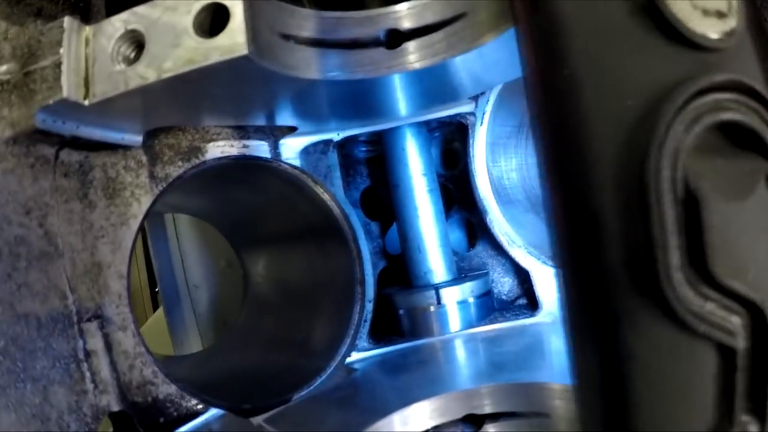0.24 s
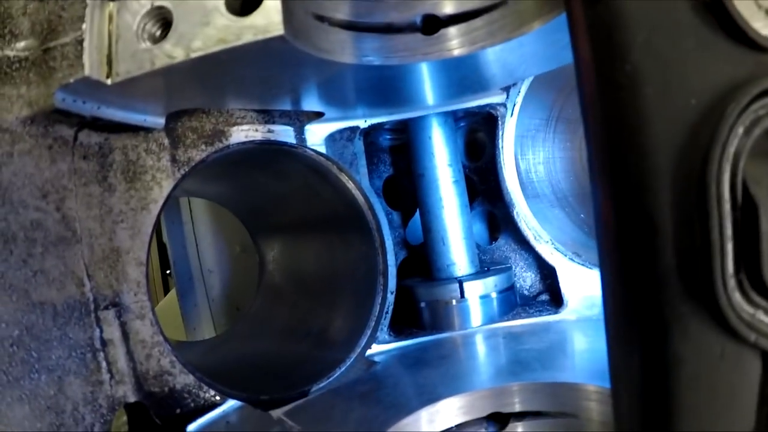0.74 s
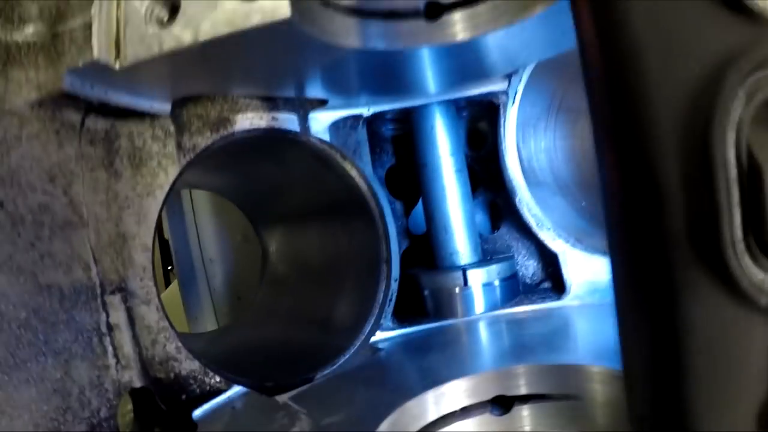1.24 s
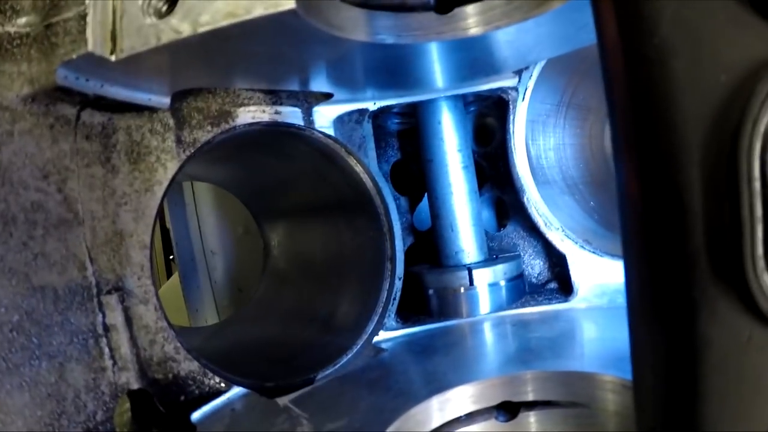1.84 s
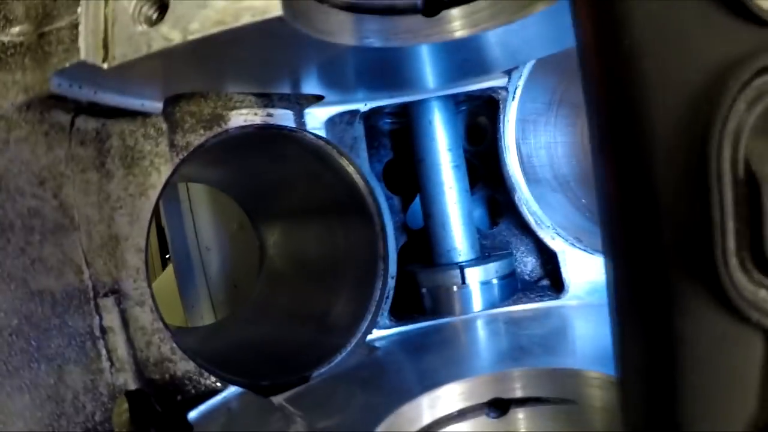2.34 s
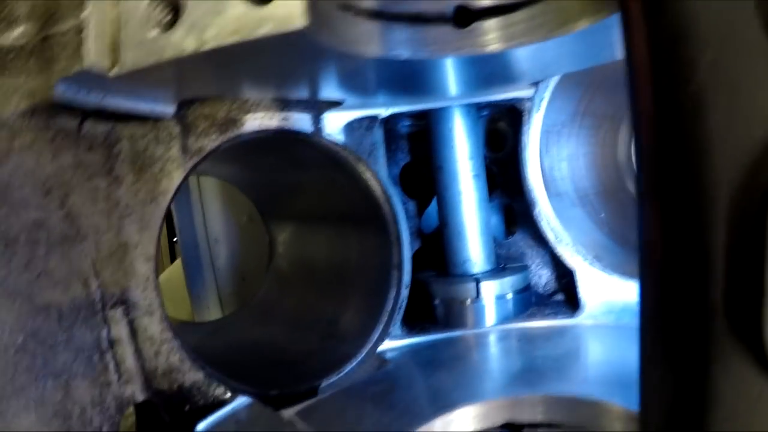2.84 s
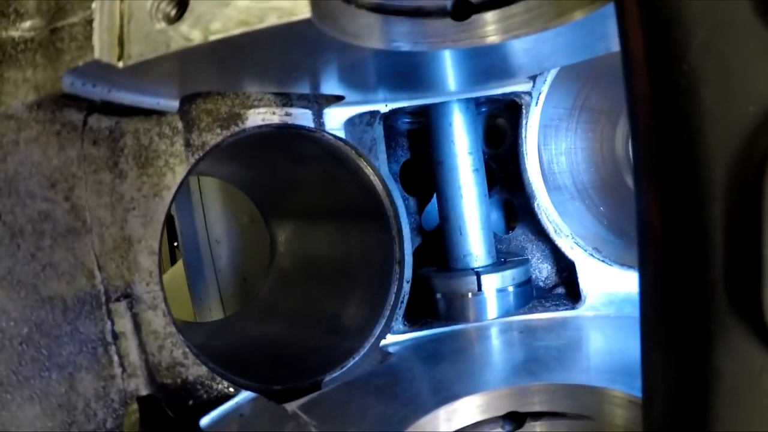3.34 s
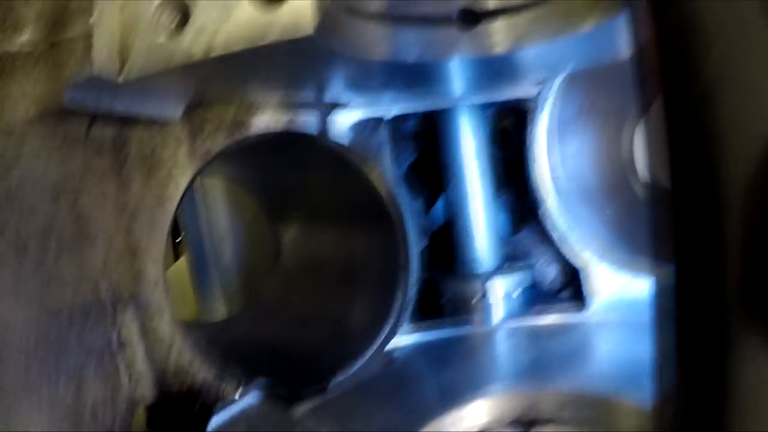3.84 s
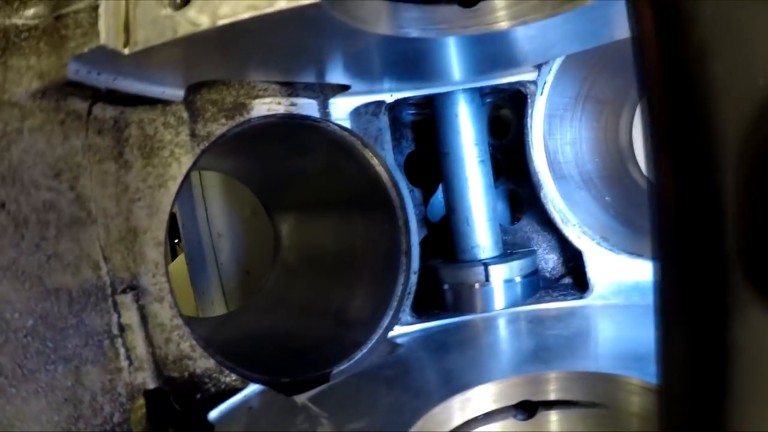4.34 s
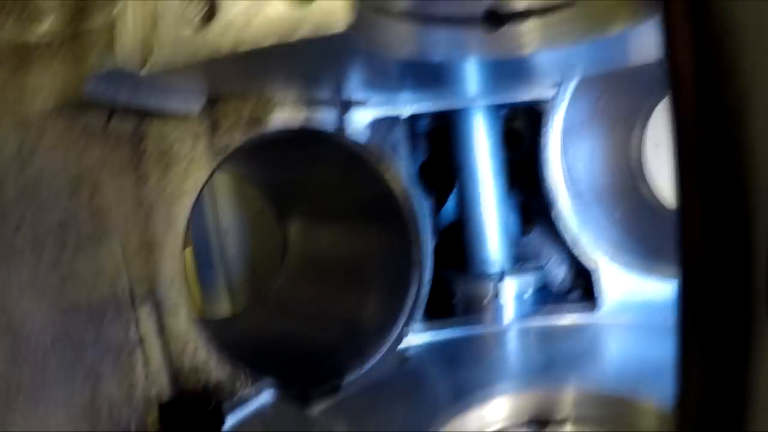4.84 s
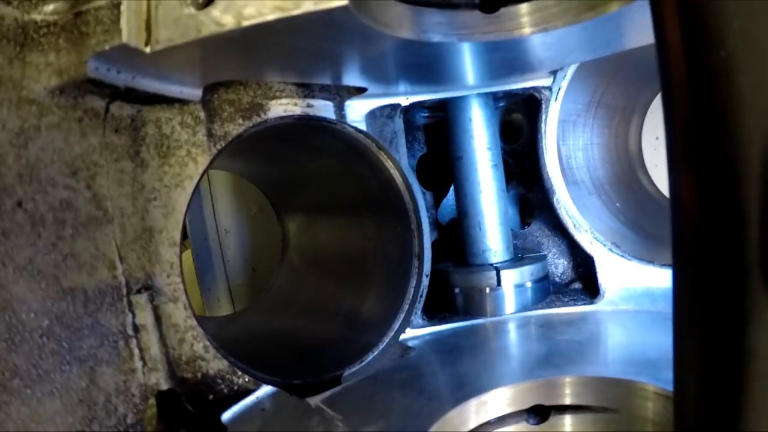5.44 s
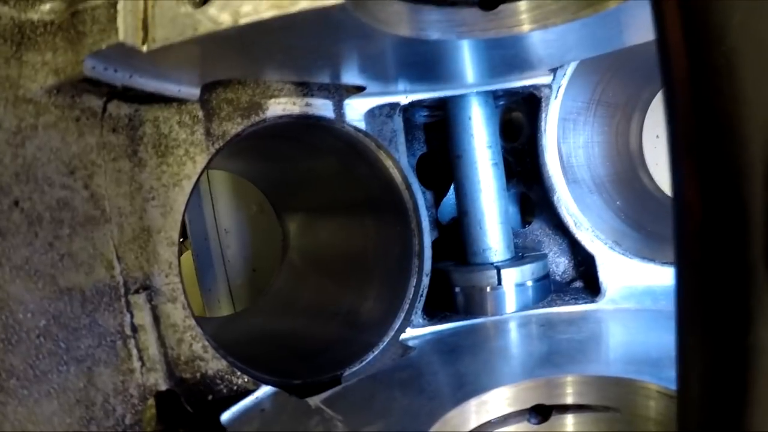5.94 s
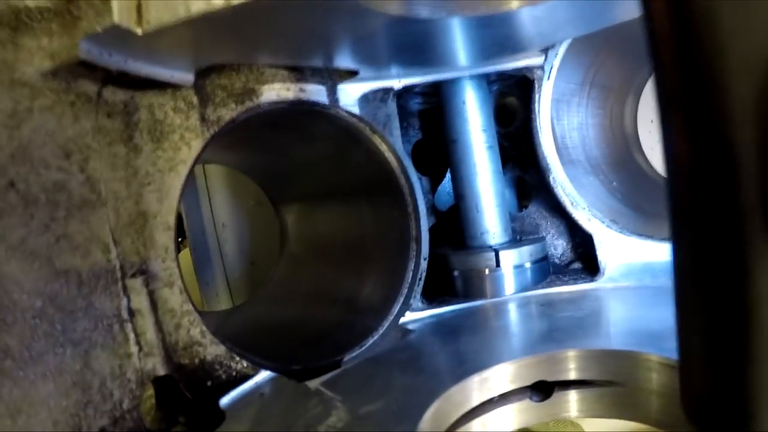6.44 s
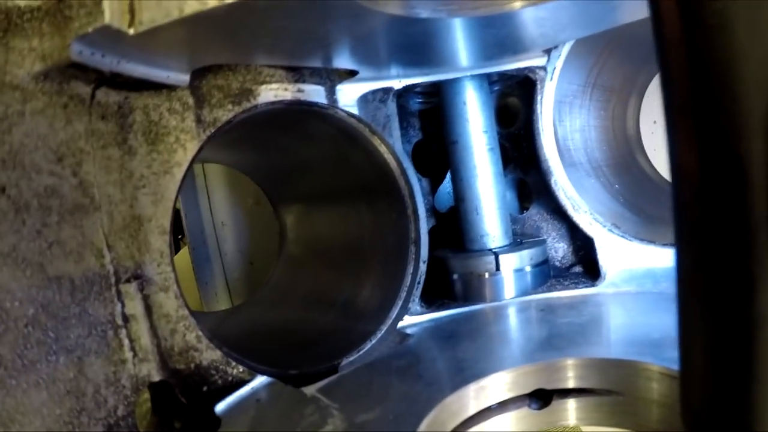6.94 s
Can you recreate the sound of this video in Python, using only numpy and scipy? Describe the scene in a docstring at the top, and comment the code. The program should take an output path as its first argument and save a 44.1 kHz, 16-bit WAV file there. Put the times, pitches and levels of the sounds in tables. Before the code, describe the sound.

Close, harsh metal hammering in a garage, heavy clanging blows about a second apart, each followed by a light tap, rattles and short echo.

```python
"""Driving a bearing home, close by in a garage

A hand-held stereo microphone hears a hammer drive a bearing into an engine block through a steel driver.
Five heavy blows, after the dying end of another, alternate with light taps as the hammer is set back.
Steel contacts are filtered noise and dying sines; the block then shudders on its stand and a loose part rattles.
Walls add noise-like echoes; rustle, rumble, hiss and a drone lie behind. Blows overload the recorder and duck it."""
import sys
import numpy as np
from scipy import signal
from scipy.fft import rfft, irfft
from scipy.io import wavfile
from scipy.ndimage import minimum_filter1d

SR = 44100
rng = np.random.default_rng(int(sys.argv[2]) if len(sys.argv) > 2 else 0)


def transcribe(u):
    """Save the signal u as a 16-bit wav file named by the first command-line argument.

    u: samples, shape (n,) or (channels, n), limited to [-1, 1]; the rate is SR.
    q: integer samples, one column per channel.
    """
    v = np.clip(np.atleast_2d(u).T, -1, 1)
    q = np.round(v * 32767).astype(np.int16)
    wavfile.write(sys.argv[1], SR, q)


N = 316638  # samples


def amp(db):
    """Decibels to gain."""
    return 10 ** (np.asarray(db) / 20)


def evened(x):
    """Scales to rms 1."""
    return x / np.sqrt(np.mean(x ** 2) + 1e-20)


def read(points, hz):
    """Reads a table on a log-frequency axis."""
    f, value = np.transpose(points)
    return np.interp(np.log(hz + 1), np.log(f + 1), value)


def add(mix, start_s, sound):
    """Mixes a sound in at a time in seconds; what falls outside is dropped."""
    at = round(start_s * SR)
    sound = sound[:, max(-at, 0):]
    part = mix[:, max(at, 0):][:, :sound.shape[1]]
    part += sound[:, :part.shape[1]]


def stereo_white(size, same):
    """White noise for left and right; same is the share of power common to both."""
    same = np.clip(same, 0, 1)
    common = np.sqrt(same) * rng.standard_normal(size)
    return common + np.sqrt(1 - same) * rng.standard_normal((2, size))


def noise(colour, size, same):
    """Steady stereo noise of a given colour and left-right likeness, rms 1."""
    hz = np.fft.rfftfreq(size, 1 / SR)
    spectrum = rfft(stereo_white(size, same)) * amp(read(colour, hz))
    return evened(irfft(spectrum, size))


def octaves(hz):
    """Octaves above 3 kHz, the middle of the steel's range, for tilting a spectrum between 1 and 12 kHz."""
    return np.log2(np.clip(hz, 1000, 12000) / 3000)


def dying(t60, size):
    """An envelope that falls 60 dB in t60 seconds."""
    return np.exp(-np.log(1000) * np.arange(size) / SR / t60)


def ring(modes, size, scatter_db, spread):
    """Dying sines, excited a little differently at each contact and out of step between left and right."""
    t = np.arange(size) / SR
    out = np.zeros((2, size))
    for hz, db, t60 in modes:
        luck, lag, start = rng.standard_normal(3)
        phase = np.pi * start + spread * lag * np.array([[-.5], [.5]])
        sine = np.sin(2 * np.pi * hz * t + phase)
        out += amp(db + scatter_db * luck) * dying(t60, size) * sine
    return out * (1 - dying(.002, size))  # soft onset


def burst(colour, envelope, same, tilt_db=0):
    """A puff of stereo noise rings through a causal filter of the given colour; the envelope sets its rms."""
    size = len(envelope)
    hz = abs(np.fft.fftfreq(size, 1 / SR))
    gain = evened(amp(read(colour, hz) + tilt_db * octaves(hz)))
    # minimum phase: the filter rings only after the puff
    response = np.exp(np.conj(signal.hilbert(np.log(gain + 1e-5))))
    puff = envelope * stereo_white(size, same)
    coloured = np.fft.ifft(np.fft.fft(puff) * response).real
    return evened(coloured) * np.sqrt(np.mean(envelope ** 2))


# How fast the garage's echo dies. Each row: frequency in Hz, t60 in seconds.
ECHO_T60 = [(100, 0.47), (1000, 0.32), (3000, 0.5), (7500, 0.43), (10000, 0.21), (15000, 0.08)]


def tail(colour, tilt_db=0, size=32768):
    """A dense echo that builds within milliseconds, each band dying at its own speed; left energy is 1."""
    hz, t, z = signal.stft(rng.standard_normal((2, size)), SR, nperseg=256)
    z = z * np.exp(-np.log(1000) * t / read(ECHO_T60, hz)[:, None])
    z = z * amp(read(colour, hz) + tilt_db * octaves(hz))[:, None]
    echo = signal.istft(z, SR, nperseg=256)[1][:, :size] * (1 - dying(0.036, size))
    echo = echo + .35 * echo[::-1]  # each side is also heard on the other
    return echo / np.linalg.norm(echo[0])


# Movement of the hands, rising before each swing and stilled after it.
# Each row: time in seconds, movement in dB on a scale where REST_DB is rest.
MOVING = [(0, -57), (.4, -63.5), (.88, -55), (1.08, -56), (1.65, -62.5), (2.15, -56), (2.55, -63),
          (3.15, -56.5), (3.3, -52.5), (3.76, -49), (3.92, -60.5), (4.55, -64), (4.88, -55.5), (5.18, -68),
          (5.5, -61.5), (6.15, -55), (6.7, -63), (7.18, -56)]
REST_DB = -60
# Colours of the hands' rustle, of the rumble and of the hiss. Each row: frequency in Hz, relative level in dB.
RUSTLE = [(53, -38), (90, -13.5), (130, 2), (201, -11.5), (272, -3), (438, -16), (488, -11), (620, -19),
          (706, -13), (896, -24), (1350, -18), (1610, -25.5), (6300, -43), (10400, -46.5), (16000, -79)]
RUMBLE = [(10, -8), (25, 5), (60, 4), (90, -14), (140, -17), (300, -47.5), (1000, -97.5)]
HISS = [(200, -22), (2000, 3.5), (4000, -6), (6400, 3), (8000, -7), (10000, -19), (13000, -21),
        (16000, -41.5)]
# Wavering drone of the garage. Each row: frequency in Hz, level in dB.
DRONE = [(60, -67), (122, -61), (258, -61.5), (318, -63), (412, -64.5), (535, -66.5), (695, -71)]
# what follows the hands: (level at rest in dB, dB gained per dB of movement)
RUSTLE_LAW, RUMBLE_LAW, HISS_LAW = (-50, 0.87), (-42.5, .9), (-71, 1.3)
# a blow jolts the hand at the microphone: rumble in dB relative to its force, time constant in seconds
JOLT_DB, JOLT_S = -34.5, .08


def background():
    """Noises follow the moving hands, each blow jolts the rumble, and a faint drone of sines wavers in phase."""
    t = np.arange(N) / SR
    moving_db = np.interp(t, *np.transpose(MOVING)) - REST_DB
    rustle, rumble, hiss = (amp(db + share * moving_db) for db, share in (RUSTLE_LAW, RUMBLE_LAW, HISS_LAW))
    jolt = sum(amp(JOLT_DB + db) * (t > s) * np.exp(-abs(t - s) / JOLT_S) for s, db, _ in BLOWS)
    out = rustle * noise(RUSTLE, N, same=.55)
    out += (rumble + jolt) * noise(RUMBLE, N, same=0.024) * amp([[-.8], [.8]])  # leans right
    out += hiss * noise(HISS, N, same=0.33)
    knots = np.linspace(0, t[-1], num=60)
    for hz, db in DRONE:
        waver = np.interp(t, knots, rng.standard_normal(len(knots)))
        out += amp(db) * np.sin(2 * np.pi * hz * t + 0.53 * waver)
    return out


# Echo strength of the garage. Each row: frequency in Hz, relative level in dB.
ECHO = [(100, 3.5), (700, -4.5), (1700, -7), (3600, -12), (5200, -3), (7800, -2), (8700, -8.5),
        (14000, -15)]


def garage(x):
    """The walls prolong whatever rings: convolution with a dense echo."""
    return signal.fftconvolve(x, tail(ECHO), axes=1)[:, :N]


BOUNCE_S, BOUNCE_JITTER_S = .019, 0.0016  # time between bounces of the loose part, and its random spread
CHATTER_FADE_DB_PER_S, CHATTER_SCATTER_DB = 53, 3.5
REBOUND_TILT_DB = -4  # dB per octave: all chatter has this tilt, and a tick gains it at each rebound


def chatter(start, first_db, count=12):
    """A knock sets the loose part bouncing in a nearly even, fading run: rows of (s, dB, dB per octave)."""
    late, luck = rng.standard_normal((count, 2)).T
    age = np.arange(count) * BOUNCE_S
    times = start + age + BOUNCE_JITTER_S * late
    levels = first_db - CHATTER_FADE_DB_PER_S * age + CHATTER_SCATTER_DB * luck
    return [(s, db, REBOUND_TILT_DB) for s, db in zip(times, levels)]


# Single ticks of the loose part. Each row: start in seconds, level in dB, brightness in dB per octave.
TICKS = [(0.1397, -46, -4), (0.1599, -34.5, -5), (1.2881, -31.5, -4), (1.4390, -29.5, -1.5),
         (1.5825, -38, -17), (2.4216, -33, -13), (2.4675, -36, -4.5), (2.5355, -35, -15),
         (2.5949, -35.5, -11.5), (4.15, -34.5, 0), (4.284, -37, -8), (4.436, -39, -7.5), (5.1315, -42, -6),
         (5.2873, -45.5, -7.5), (6.3620, -31, 6.5), (6.8325, -40, -11), (6.9716, -38, -9),
         (7.1024, -40.5, -8.5)]
# Colour of a tick. Each row: frequency in Hz, relative level in dB.
TICK = [(100, -17), (600, -14), (1100, -3), (1700, 0), (2500, -4), (4000, -13), (7500, -24), (9000, -42),
        (16000, -66)]
# A tick and its two rebounds. Each entry: level in dB relative to the tick.
TICK_BOUNCE_DB = [0, -9.5, -16]


def ticks(size=4096):
    """A loose part clicks and rebounds, or chatters after a knock: short puffs of coloured noise."""
    out, clicks = np.zeros((2, N)), []
    for s, db, tilt_db in TICKS:
        for k, step_db in enumerate(TICK_BOUNCE_DB):
            clicks.append((s + k * BOUNCE_S, db + step_db, tilt_db + k * REBOUND_TILT_DB))
    for s, _, chatter_db in KNOCKS:
        clicks += chatter(s, chatter_db)
    shape = dying(.008, size) + amp(-15) * dying(.05, size)
    for s, db, tilt_db in clicks:
        add(out, s, amp(db) * burst(TICK, shape, same=0.93, tilt_db=tilt_db))
    return out


# The block rocks on its stand.
# Each row: start in seconds, relative knock level in dB, level in dB of the chatter that it sets off.
KNOCKS = [(0.010, -34, -37.5), (0.073, -33.5, -50), (1.195, -22, -36.5), (2.125, -14.5, -34.5),
          (2.223, -18.5, -37), (2.332, -33, -44.5), (3.892, -20.5, -42), (4.031, -26.5, -40.5),
          (4.837, -18.5, -41.5), (4.912, -18.5, -38.5), (6.118, -20, -34), (6.258, -25, -32.5),
          (6.401, -32.5, -58), (6.531, -34, -50)]
# Modes of the stand. Each row: frequency in Hz, relative level in dB, t60 in seconds.
STAND = [(118, -5.5, .13), (150, -6, .08), (243, -6, .07), (277, 0, .11), (355, -7, .06), (445, -17, .08),
         (585, -19, .09)]
# Grit in each knock. Each row: frequency in Hz, relative level in dB.
SCUFF = [(50, -15.5), (130, -10.5), (200, -1), (290, 5.5), (420, -11.5), (800, -19.5), (1300, -24.5),
         (3000, -36), (9000, -69)]
ROCK_BACK_S, ROCK_BACK_DB = .034, -12  # each knock is followed by a softer one as the block rocks back


def knocks(size=16384):
    """The heavy block rocks on its stand and back: round, swelling contacts ring its modes, with some grit."""
    out = np.zeros((2, N))
    soft = 1 - dying(.025, size)
    for s, db, _ in KNOCKS:
        for late, step_db in [(0, 0), (ROCK_BACK_S, ROCK_BACK_DB)]:
            scuff = amp(-7) * burst(SCUFF, soft * dying(.12, size), same=.95)
            boom = soft * ring(STAND, size, scatter_db=1, spread=.15)
            add(out, s + late, amp(db + step_db + 3) * (boom + scuff))
    return out * amp([[1.4], [-1.4]])  # leans left


STUTTER_DB = -22  # relative to the force of the blow


def stutter(size=4096):
    """A faint stutter swells into each heavy crack: three puffs of the crack's colour, made duller."""
    out = np.zeros((2, N))
    for s, db, _ in BLOWS:
        # lead in s, relative level in dB, t60 in s
        for ahead, step_db, t60 in [(.0415, -22, .025), (.0205, -17, .16), (.0100, -2, .07)]:
            puff = burst(CRACK, dying(t60, size), same=.6, tilt_db=-2.0)
            add(out, s - ahead, amp(db + STUTTER_DB + step_db) * puff)
    return out


# Modes of the driver.
# Each row: frequency in Hz, relative level in dB, t60 in seconds, share of the off-centre boost.
DRIVER = [(1571, -9, .12, 0), (1711, -6.5, .125, 0), (1910, -6, .05, 0), (2250, -11, .11, 0),
          (2333, -12, .085, 1.1), (2556, -14, .11, .8), (2627, -14, .09, -.3), (2900, -12, .06, -.3),
          (3536, -7.5, .09, .7), (3690, -8, .05, 0), (3828, -12, .08, 0), (3983, -12, .1, .3),
          (5017, -16, .1, 0), (5805, -18, .12, 0), (6069, -16, .1, 0), (6605, -17, .12, 0),
          (6995, -16, .12, .4), (7189, -16, .14, .4), (7388, -17, .13, .4), (7741, -18, .2, .4),
          (9550, -34, .12, .5), (13310, -33, .2, .5)]
# Colours of steel on steel, and of the crowded short ring with it.
# Each row: frequency in Hz, relative level in dB.
CRACK = [(40, -14.5), (200, -3), (500, -16.5), (1000, -9.5), (1700, -5), (2600, -5.5), (3600, 2.5),
         (5300, -6.5), (6400, 1), (7700, -11), (8600, -17), (14000, -31), (16500, -47.5)]
RING = [(40, -18.5), (250, -9), (550, -6.5), (1150, -19), (1700, 5.5), (2900, -8.5), (3700, 7), (5200, -9),
        (6500, -10), (7800, -2), (8500, -26.5), (13500, -37), (16000, -56)]


def driver(tilt_db, off_db, crack_db, crack_t60, ring_db, ring_t60, modes_db, size=16384):
    """One contact of hammer and driver: a crack, a crowd of short modes, and the clear modes."""
    modes = [(hz, db + share * off_db + tilt_db * octaves(hz), t60) for hz, db, t60, share in DRIVER]
    crack = amp(crack_db) * burst(CRACK, dying(crack_t60, size), same=0.26, tilt_db=tilt_db)
    crowd = amp(ring_db) * burst(RING, dying(ring_t60, size), same=.55, tilt_db=tilt_db)
    clear = amp(modes_db) * ring(modes, size, scatter_db=2.5, spread=0.49)
    return crack + crowd + clear


# Light taps of the hammer. Each row: start in seconds, relative force in dB, brightness in dB per octave,
# off-centre boost in dB, relative strength of the second contact in dB.
TAPS = [(0.1948, -9.5, 0, 14, 2.5), (.3000, -26.5, -6.5, 8.5, -4), (1.3700, -8.5, -0.5, 13.5, 5),
        (3.2236, -6, -3.5, -14, -1), (4.1698, -9, -1.5, -4, 3), (4.227, -23.5, -4, -2.5, -2.5),
        (5.3437, -9.5, 0, -23, 2.5), (5.424, -30, -5, -6, -1.5), (6.4520, -5.5, 1, -20, -2.5)]
# Steel heard from all sides at once, by way of the walls. Each row: frequency in Hz, relative level in dB.
WASH = [(100, -4.5), (500, -7), (1100, -9), (1700, 3), (2600, -1), (3100, -1), (3800, 3), (4500, -6),
        (5200, 0), (5600, -9), (6400, -2.5), (7700, -4.5), (8500, -19.5), (14000, -39)]
RETOUCH_S = .003  # delay of the second contact of every tap


def taps():
    """The hammer lands lightly and touches a second time a few milliseconds later, with a wash off the walls."""
    out = np.zeros((2, N))
    for s, db, tilt_db, off_db, again_db in TAPS:
        first = driver(tilt_db, off_db, crack_db=-5.5, crack_t60=0.023,
                       ring_db=-13.0, ring_t60=.085, modes_db=-11.0)
        second = driver(tilt_db, off_db, crack_db=-4.5, crack_t60=0.0055,
                        ring_db=-14.0, ring_t60=0.084, modes_db=-20.0)
        add(out, s, amp(db) * first)
        add(out, s + RETOUCH_S, amp(db + again_db) * second)
        add(out, s, amp(db + 5.0) * tail(WASH, tilt_db))
    return out


# Heavy blows, the first already dying away.
# Each row: start in seconds, relative force in dB, relative strength of its echo in dB.
BLOWS = [(-.25, 8.5, 9), (0.9949, 4, 5.5), (2.0524, 2, 5), (3.7962, 5.5, -8.5), (4.784, 2, 4.5),
         (6.0228, 4.5, 2.5)]
# Modes of the block and seated bearing, woken by heavy blows only.
# Each row: frequency in Hz, relative level in dB, t60 in seconds.
BLOCK = [(818, -35, .2), (1359, -33, .2), (1563, -21, .12), (1690, -23, .12), (2045, -20, .25),
         (2282, -23, .25), (2330, -21, .38), (3388, -30, .2), (3537, -28, .28), (4236, -30, .25),
         (4624, -31, .28), (6982, -30, .33), (7730, -34, .42), (9080, -42, .12), (10437, -47, 1.0),
         (13560, -58, .55)]
# Block and stand trembling after a blow. Each row: frequency in Hz, relative level in dB.
SHUDDER = [(20, -10.5), (60, -1), (90, -2), (125, -0.5), (190, -7.5), (280, 3.5), (400, -17.5), (800, -32),
           (3000, -70)]
# The whole block shoved by a blow. Each row: frequency in Hz, relative level in dB, t60 in seconds.
THUD = [(59, -4.5, 0.082), (134, -1.5, 0.046), (221, 7, 0.025)]


def blows(size=32768):
    """A full swing: the driver, pressed home, only cracks; the block rings, thuds and shudders with it."""
    out = np.zeros((2, N))
    for s, db, echo_db in BLOWS:
        crack = amp(4.0) * burst(CRACK, dying(0.021, size), same=0.37)
        crowd = amp(-13.5) * burst(RING, dying(0.085, size), same=0.98)
        clear = amp(-6.5) * ring(BLOCK, size, scatter_db=1.5, spread=.7)
        shudder = amp(-33.5) * burst(SHUDDER, dying(.65, size), same=.95)
        wash = amp(echo_db + 0.5) * tail(WASH)
        add(out, s, amp(db) * (crack + crowd + clear + shudder + wash))
        thud = ring(THUD, size, scatter_db=1, spread=.2)
        add(out, s + 0.003, amp(db - 11.0) * thud)
    return out


def scene():
    """Steel and small noises sound in the garage, over the background."""
    steel = (taps() + blows()) * amp([[.8], [-.8]])  # leans left
    small = knocks() + ticks()
    walls = garage(amp(-20) * steel + amp(-14) * small)
    return steel + small + walls + stutter() + background()


EDGE_HZ = 16400  # the recorder's upper limit


def record(dry, threshold_db=-11, recover_db=120, attack=0.0015, hold=0.065):
    """A limiter that comes a moment late: cracks overload, then the gain ducks and climbs back in the echo.

    recover_db is in dB per second; attack (a time constant) and hold are in seconds."""
    r = np.exp(-1 / (.002 * SR))  # power is smoothed over 2 ms
    power_db = 10 * np.log10(signal.lfilter([1 - r], [1, -r], (dry ** 2).mean(0)) + 1e-12)
    # hold the highest excess of the recent past
    width = 2 * int(abs(hold) * SR / 2) + 1
    excess_db = np.maximum(power_db - threshold_db, 0)
    over_db = -minimum_filter1d(-excess_db, width, origin=width // 2)
    # then let it fall at a steady rate
    fall = np.arange(N) * recover_db / SR
    wanted_db = np.maximum.accumulate(over_db + fall) - fall
    r = np.exp(-1 / (attack * SR))
    duck_db = signal.lfilter([1 - r], [1, -r], wanted_db)
    clipped = .94 * np.tanh(dry * amp(-duck_db))
    rounded = signal.lfilter(*signal.butter(1, 11000, fs=SR), clipped)  # gentle treble loss
    edge = signal.firwin(255, EDGE_HZ, window=("kaiser", 9), fs=SR)
    return signal.oaconvolve(rounded, edge[None], "same", axes=1)


dry = scene()
out = record(dry)
transcribe(out)
```